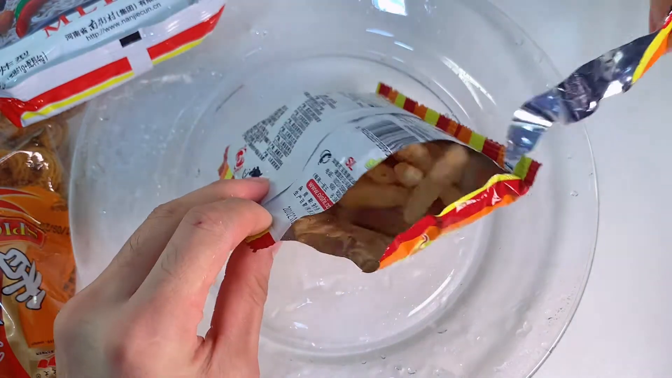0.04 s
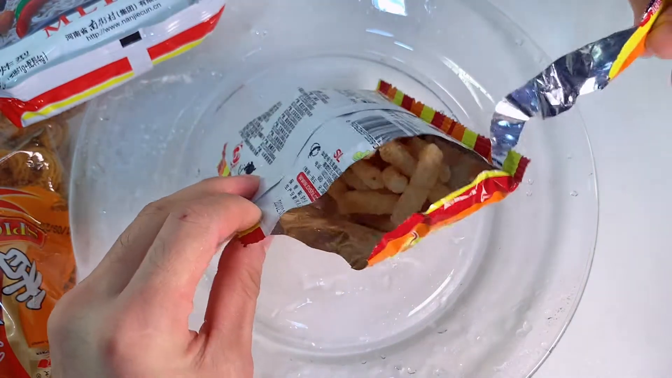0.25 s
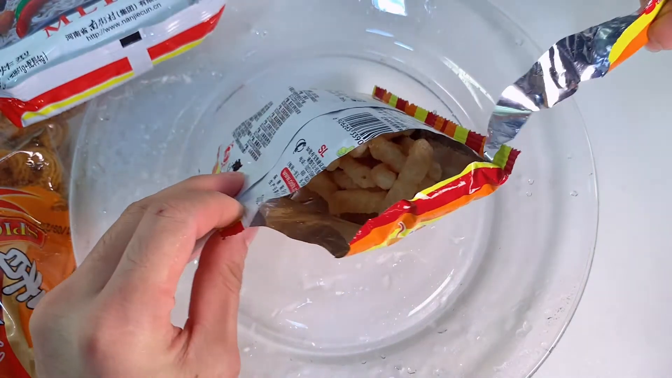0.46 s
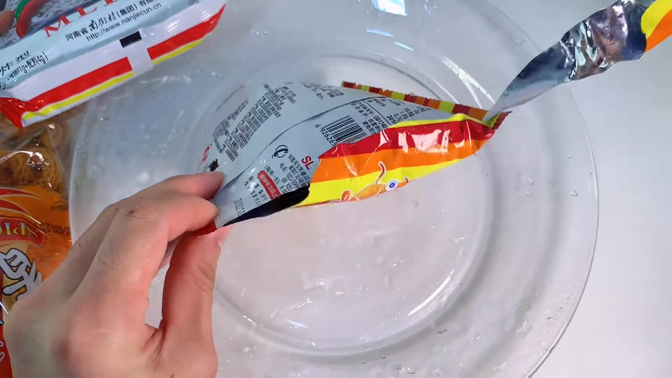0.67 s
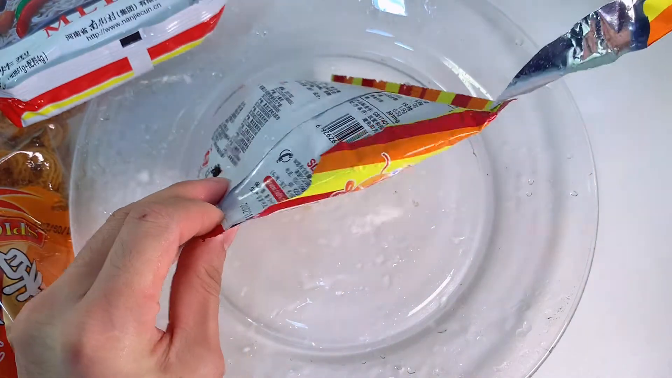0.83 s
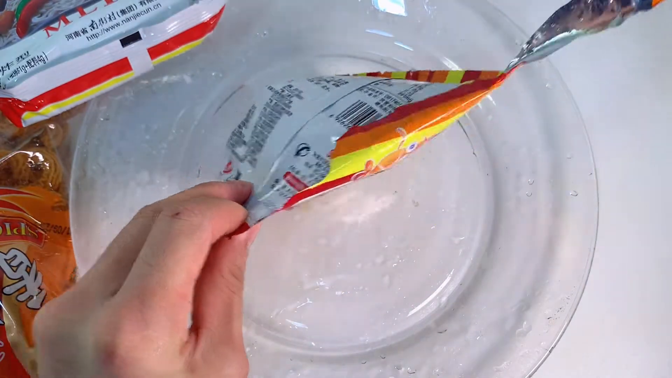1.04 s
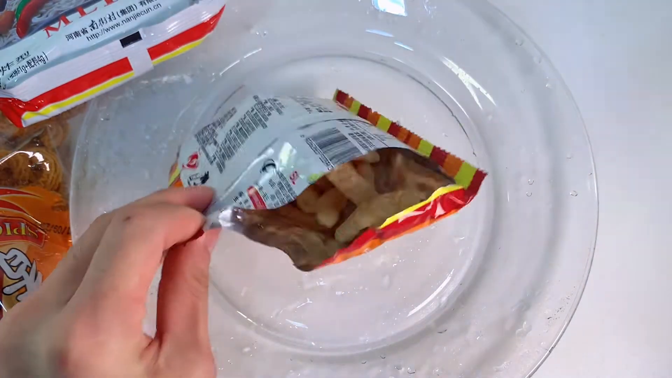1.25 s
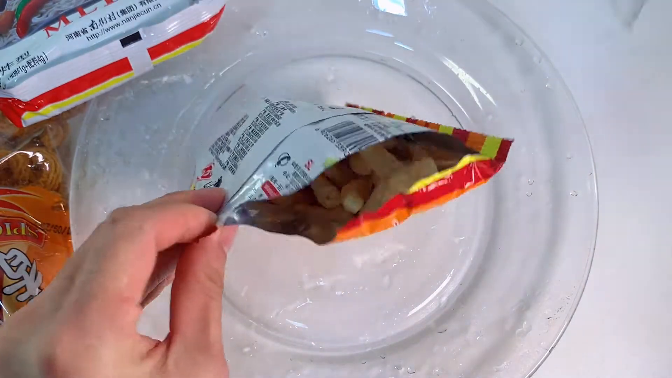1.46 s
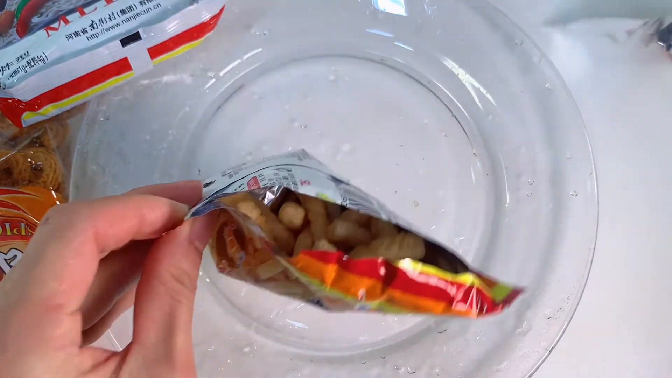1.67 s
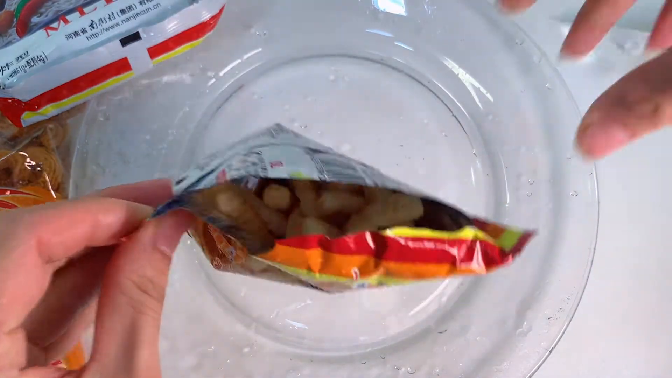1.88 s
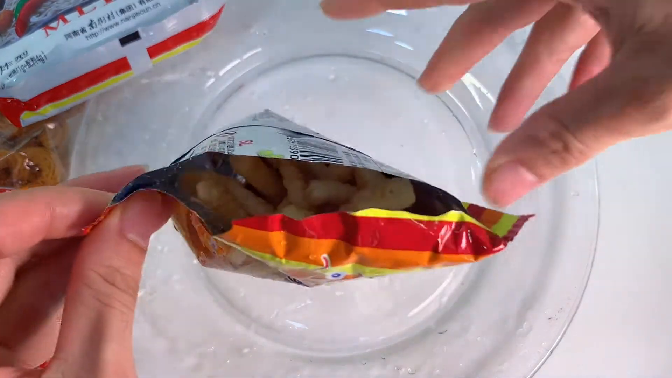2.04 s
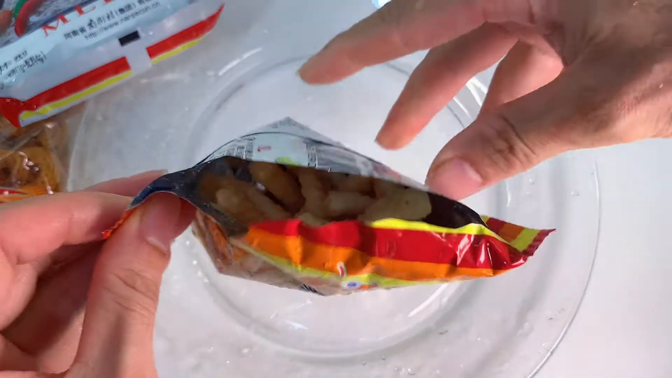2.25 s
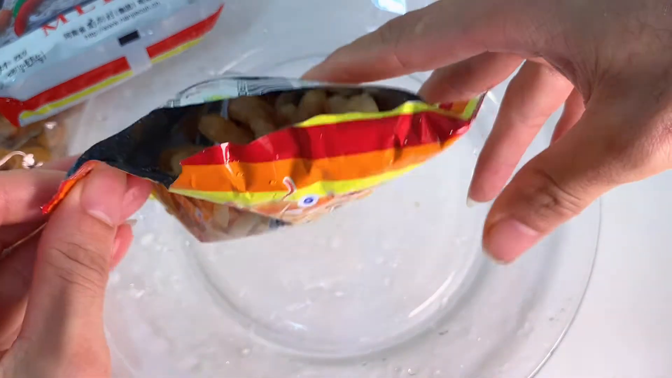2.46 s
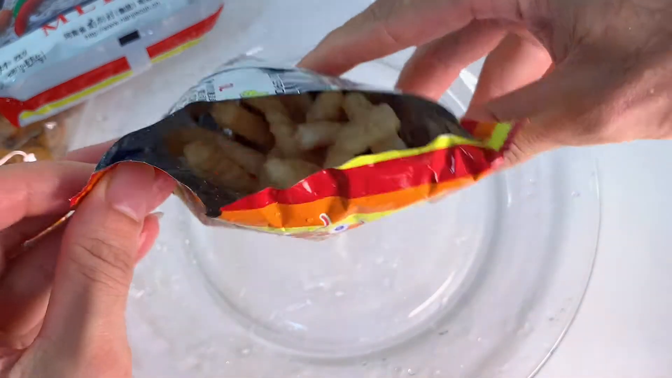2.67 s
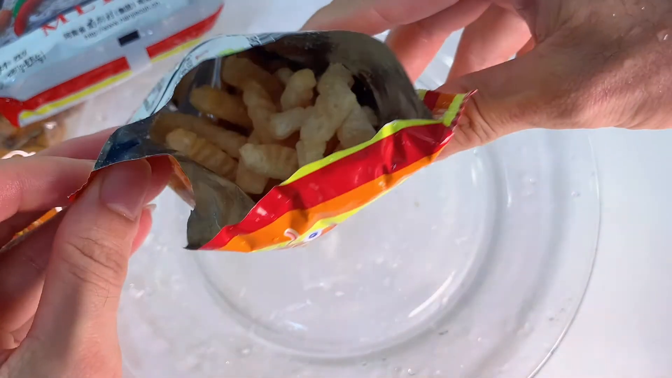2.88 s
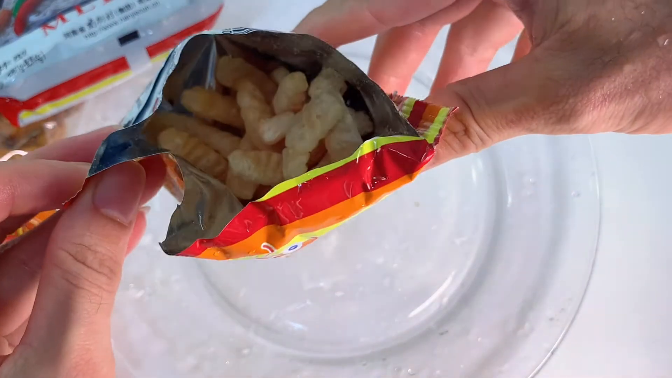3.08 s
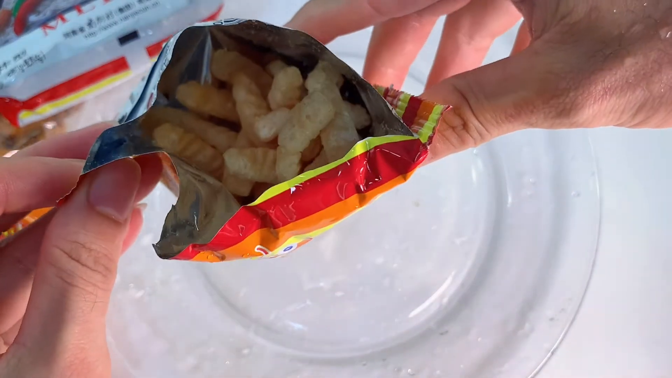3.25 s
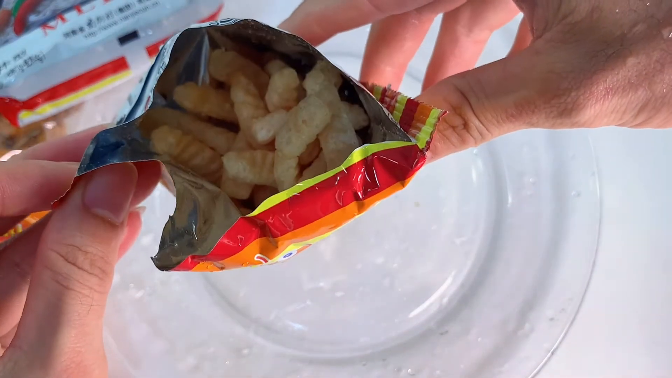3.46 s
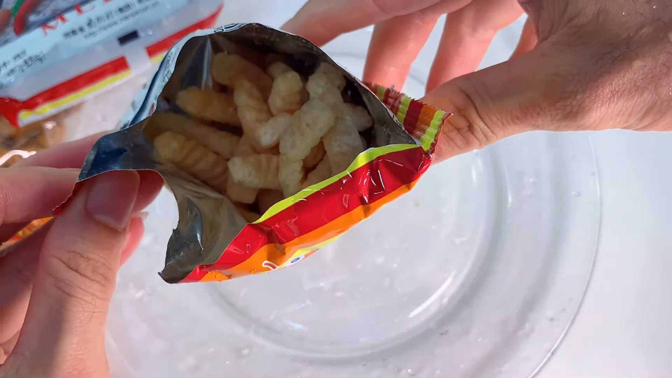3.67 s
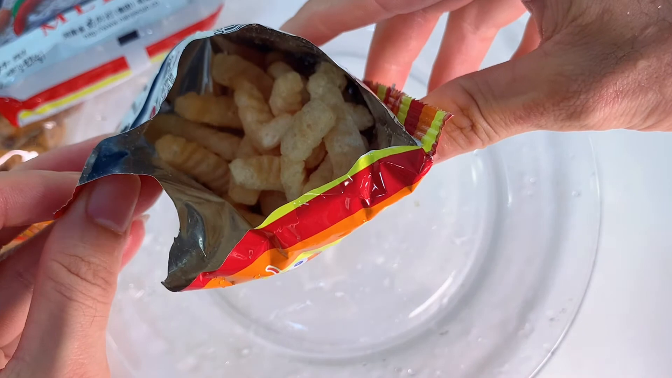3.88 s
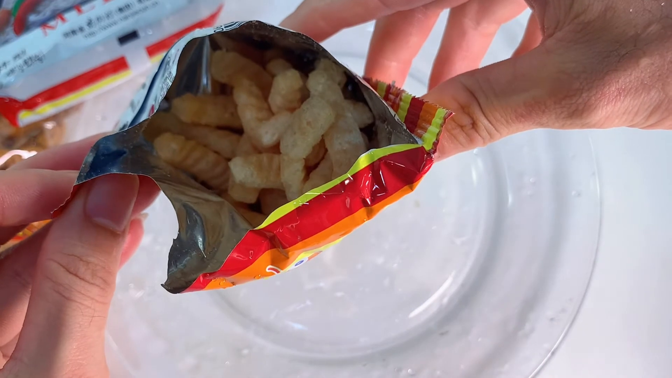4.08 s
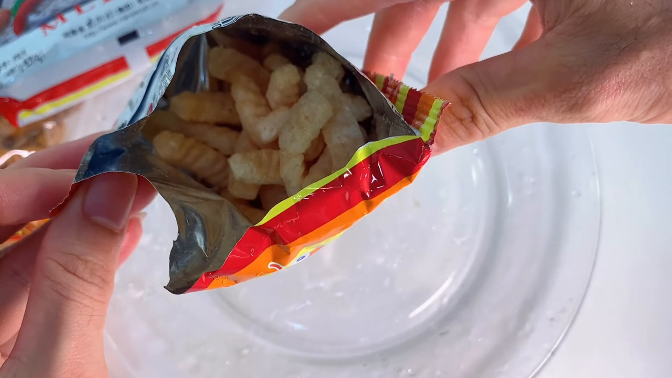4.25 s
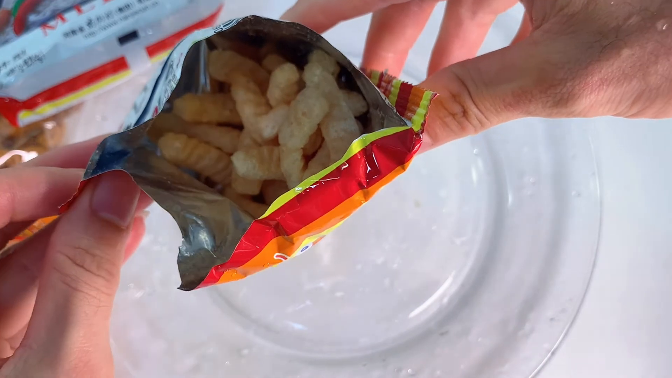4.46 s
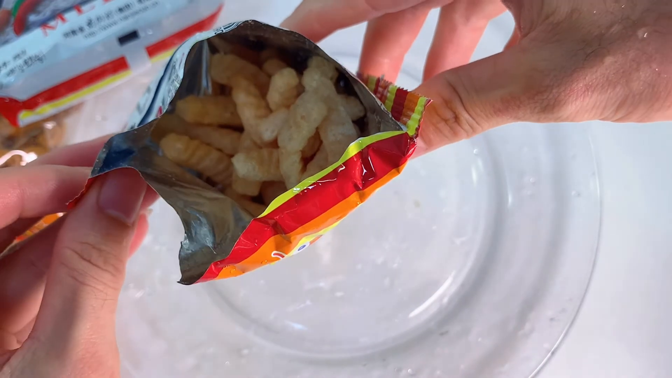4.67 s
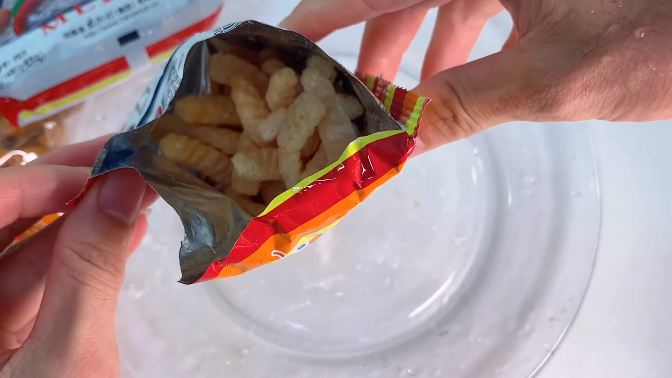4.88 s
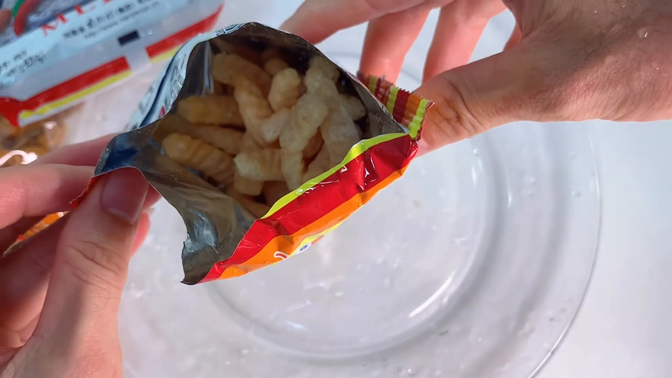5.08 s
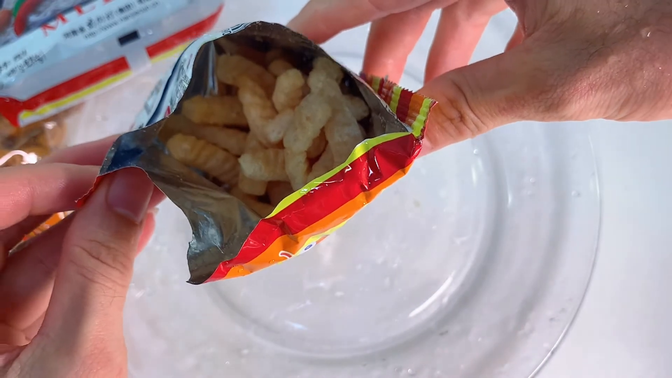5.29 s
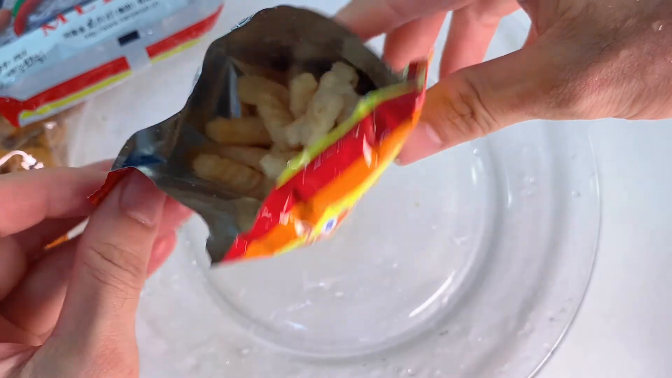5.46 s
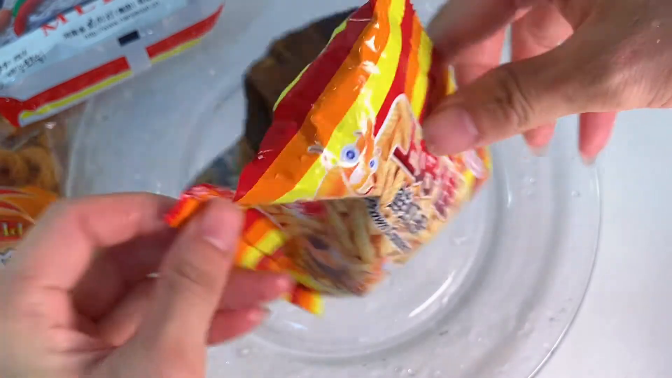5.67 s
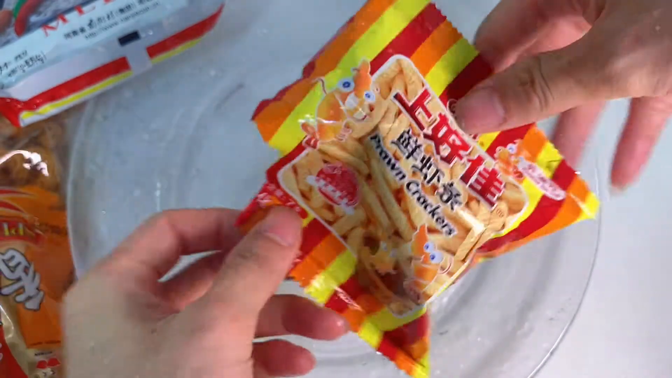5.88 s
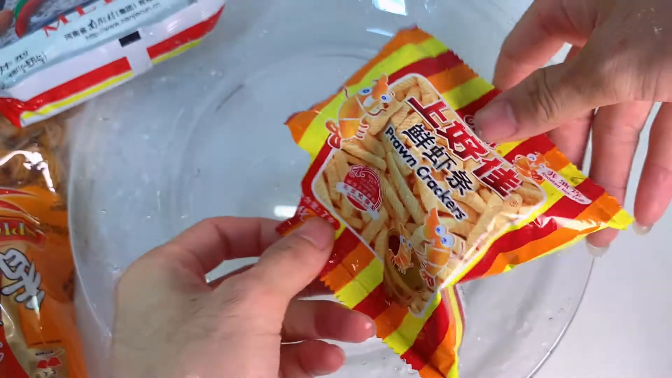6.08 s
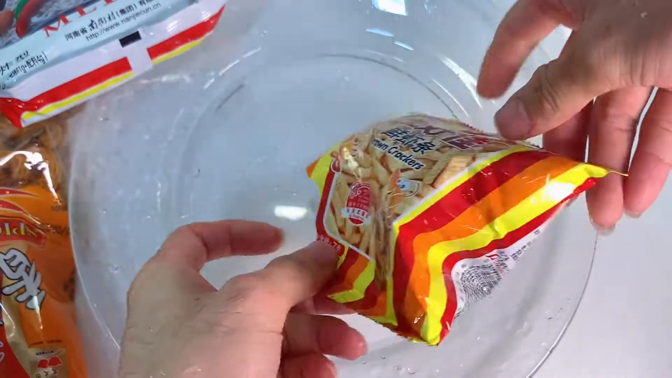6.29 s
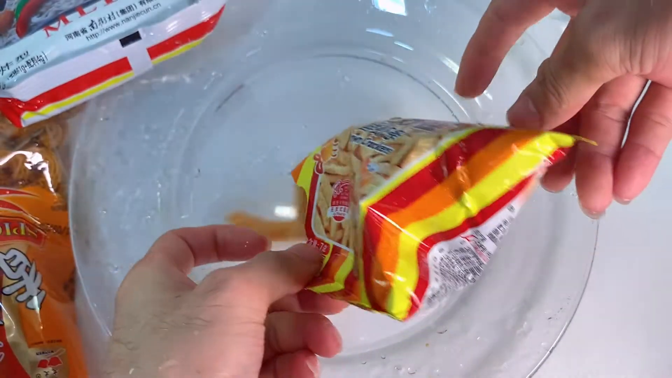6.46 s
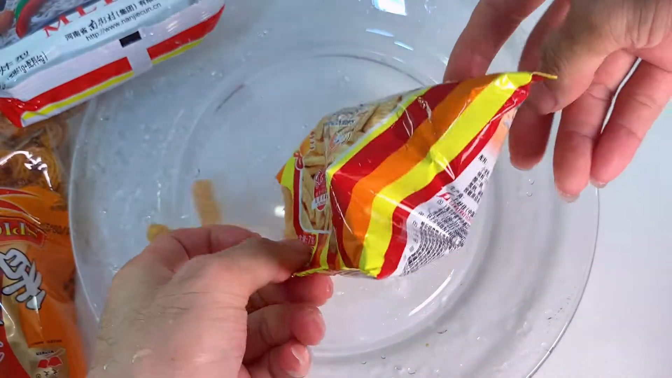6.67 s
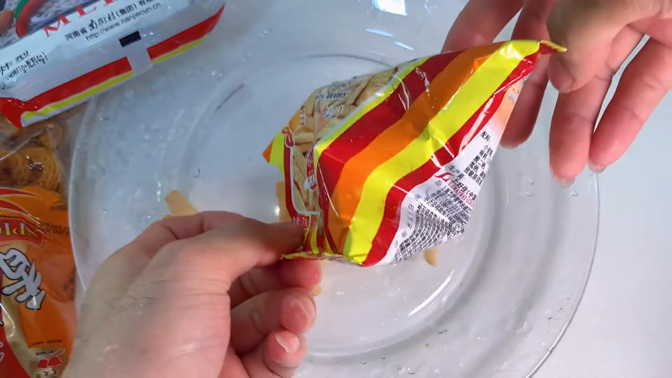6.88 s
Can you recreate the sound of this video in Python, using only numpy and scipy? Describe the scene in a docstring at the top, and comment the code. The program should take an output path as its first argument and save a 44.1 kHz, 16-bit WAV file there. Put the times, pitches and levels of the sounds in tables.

```python
"""Hands tear a strip off a foil snack packet, hold it open, then tip it over a glass bowl.
From the first touch, creases buckle in sharp snaps (struck noise bands) over a fine rustle (random grains).
Near the end a heap of crisps patters out (fading noise ticks) and rings the bowl (decaying sine modes).
Throughout, a quiet room hums behind (coloured noise) with a few faint tones, and its walls answer softly."""
import sys
import numpy as np
from scipy import signal
from scipy.fft import rfft, irfft, next_fast_len
from scipy.io import wavfile
from scipy.ndimage import uniform_filter1d

SR = 44100
rng = np.random.default_rng(int(sys.argv[2]) if len(sys.argv) > 2 else 0)


def int16_out(signal):
    """Quantize to a 16-bit WAV file."""
    q = np.round(np.clip(np.atleast_2d(signal).T, -1, 1) * 32767)
    wavfile.write(sys.argv[1], SR, q.astype(np.int16))


N = 305613  # length in samples

# Creases that buckle and crisps that knock:
# t/s, level/dB, panel ring f/Hz, treble over the level/dB
SNAP_EVENTS = [(0.072, -41.5, 1990, -11), (0.567, -39.5, 2060, -23), (0.6474, -32.5, 3270, -14),
               (0.6871, -29, 4500, 3), (0.7054, -20, 4150, -5.5), (0.766, -35, 3520, -12),
               (0.7887, -22.5, 2150, -9), (0.796, -21.5, 2770, -7), (0.808, -16.5, 2800, -7.5),
               (0.8163, -23, 4200, -19), (0.824, -28.5, 4500, -3.5), (0.8371, -20.5, 4230, -9),
               (0.8493, -25.5, 4460, -8), (0.8585, -26.5, 4700, -11), (0.8946, -36.5, 1100, -16),
               (0.952, -33, 4360, -4), (0.956, -27.5, 5600, 7), (0.9622, -30, 4500, -5),
               (0.9669, -25, 2200, -3.5), (0.9855, -35, 2280, -13), (1.0208, -31.5, 2380, -11.5),
               (1.073, -39, 3660, -9), (1.088, -22.5, 3800, 0), (1.1236, -14.5, 1990, -13.5),
               (1.127, -17, 2450, -3.5), (1.1337, -20.5, 3000, -8), (1.1393, -19.5, 3620, -7),
               (1.1625, -20, 2680, -21), (1.191, -32.5, 2900, -12), (1.2146, -29, 2030, -7),
               (1.2264, -33.5, 2500, -3.5), (1.233, -31, 2120, -15.5), (1.3289, -34, 2780, -8.5),
               (1.418, -46, 4420, -4), (1.447, -37, 2950, -1), (1.4503, -25.5, 4660, 1.5),
               (1.4597, -30.5, 4500, -5), (1.511, -26.5, 2590, -10), (1.552, -18.5, 2050, -4),
               (1.5639, -30, 5340, -4), (1.6026, -34, 3120, -3), (1.6122, -33.5, 2900, -5),
               (1.6216, -24.5, 5160, -2.5), (1.647, -26.5, 2280, -3.5), (1.6679, -30.5, 2170, -8),
               (1.697, -29, 3240, 0), (1.8342, -47.5, 1870, -31), (1.888, -50.5, 4930, 1),
               (2.029, -46.5, 1800, 2.5), (2.053, -50, 1300, -3), (2.112, -38.5, 1130, -36),
               (2.124, -31.5, 3680, -15), (2.227, -43, 1500, -17.5), (2.259, -55, 1750, 2.5),
               (2.408, -53.5, 1890, -36), (2.4404, -48, 1230, -18), (2.4895, -42, 1760, -31),
               (2.4997, -46.5, 1210, -8.5), (2.573, -46, 3500, -12), (2.581, -48.5, 1100, -27),
               (2.587, -42.5, 4200, -22), (2.6304, -27, 1120, -14), (2.665, -43, 800, -32),
               (2.688, -33.5, 1900, -32), (2.694, -35, 1300, -15), (2.712, -30, 3750, -6.5),
               (2.791, -40.5, 1690, -32), (2.809, -37.5, 870, -24), (2.8222, -35, 1310, -13),
               (2.8347, -29.5, 1920, -5.5), (2.882, -39.5, 4020, -21), (2.9262, -31, 1000, -10.5),
               (2.967, -49, 1010, -22), (3.076, -55.5, 1300, -30), (3.148, -51, 500, -30),
               (3.5897, -44, 1680, -14), (3.6105, -42.5, 1610, -37), (3.7006, -25, 2700, -19),
               (3.769, -49.5, 790, -33), (3.893, -54.5, 2900, -5), (4.2484, -49.5, 720, -25.5),
               (4.318, -31, 2600, -3), (4.7066, -48.5, 838, -31), (5.3334, -48.5, 714, -21.5),
               (5.393, -62, 5300, 6), (5.493, -48.5, 650, -33), (5.5058, -48, 4330, -34),
               (5.537, -43.5, 890, -30), (5.58, -32.5, 1660, -18), (5.599, -27.5, 1720, -13),
               (5.6068, -41, 4310, -12), (5.624, -40, 660, -19), (5.644, -34.5, 1270, -12),
               (5.7176, -23.5, 4400, -9.5), (5.721, -24.5, 1390, -1), (5.8282, -34, 5130, -28),
               (5.846, -32.5, 4950, -2.5), (5.881, -33.5, 1830, -30), (5.9043, -29.5, 3460, -22),
               (6.0066, -37, 1040, -4), (6.081, -38, 2480, -22.5), (6.1643, -30, 2170, -16.5),
               (6.205, -39.5, 1310, -9), (6.217, -43, 1930, -17), (6.292, -36.5, 2000, -12),
               (6.3566, -25, 4370, 0.5), (6.3655, -21, 3760, -3.5), (6.377, -23, 2550, -11),
               (6.447, -34, 1010, -9), (6.484, -34, 3640, -13), (6.511, -36, 2030, -11),
               (6.562, -39, 2580, -8), (6.597, -41.5, 3000, -8), (6.7396, -41, 4480, -2),
               (6.807, -35, 1910, -15), (6.828, -38, 2540, -8), (6.8985, -31.5, 3600, -2),
               (6.9038, -26.5, 1740, -11.5)]


def snaps():
    """Buckling: a crease lets go, its panel rings, its edge spits treble; dull snaps push more of the bag's air."""
    out = np.zeros(N)
    noise = rng.standard_normal((len(SNAP_EVENTS), 4, 1600))
    durations = amp(0.7 * rng.standard_normal(len(SNAP_EVENTS)))  # slightly uneven decay times
    for (s, db, hz, treble_db), (a, b, c, d), long in zip(SNAP_EVENTS, noise, durations):
        ring = amp(-5.5) * struck(a, 0.8 * hz, 1.215 * hz, 0.037 * long)
        top_hz = 5500 * amp(0.28 * min(treble_db, 0))  # dull snaps reach less high
        body = amp(-5.5) * struck(b, min(1600, top_hz / 2.6), top_hz, 0.027 * long)
        spit = amp(treble_db) * struck(c, 4800, 11500, 0.029 * long)
        thump = amp(-24.0 - 0.48 * treble_db) * struck(d, 63, 1100, 0.13)
        add(out, s, amp(db) * (ring + body + spit + thump))
    return out


def struck(noise, lo_hz, hi_hz, t60):
    """Impulsive excitation: a shiver swells into a sharp crack and outlasts it, in one band."""
    crack = 1.6 * np.roll(dying(noise, 0.07 * t60, .00005), 30)  # 30 samples late
    shiver = dying(noise, 0.36 * t60, .0007)
    tail = 0.15 * dying(noise, t60)
    x = band(crack + shiver + tail, lo_hz, hi_hz)
    x = band(x, 0.44 * lo_hz, 1.7 * hi_hz)
    return x / np.std(x[:220])  # level 1 over the first 5 ms


# Spectral weighting of the rustle: f/Hz, gain/dB (relative)
RUSTLE_SPECTRUM = [(88, -35.5), (150, -6.5), (310, -2), (500, -10), (1300, -8), (1800, -6), (11700, -9),
                   (14200, -29.5)]


def rustle():
    """Crackling noise: many small creases of very unequal size sound over the hiss of sliding foil."""
    creases_per_s = 2600
    size = amp(4.1 * np.minimum(rng.exponential(1, N), 4))
    size = size * (rng.random(N) < creases_per_s / SR)
    kind = rng.integers(0, 12, N)
    shapes = rng.standard_normal((12, 700))
    crackle = np.zeros(N)
    for k, hz in enumerate(np.geomspace(600, 9000, len(shapes))):
        grain = band(dying(shapes[k], .009), hz / 1.6, hz * 1.6)
        grain = evened(grain) * np.sqrt(hz)
        crackle += signal.oaconvolve(size * (kind == k), grain)[:N]
    hiss = .22 * rng.standard_normal(N)
    foil = colour(evened(crackle) + hiss, RUSTLE_SPECTRUM)
    return handling() * evened(foil)


RESTING_DB = -79  # foil held still
# Squeezes and pulls that rub foil and crisps:
# peak t/s, level/dB, time to swell 20 dB t/ms, time to settle 20 dB t/ms
PULL_STROKES = [(0.071, -47, 600, 259), (0.21, -56, 200, 105), (0.581, -49, 66, 400),
                (0.701, -47, 104, 200), (0.811, -34, 52, 118), (0.97, -35, 36, 91), (1.142, -30.5, 63, 185),
                (1.461, -52, 45, 400), (1.64, -39, 302.5, 114), (2.041, -55, 22, 43.5),
                (2.127, -39, 14, 41), (2.27, -56.5, 100, 62.5), (2.631, -51, 187, 498.5),
                (2.831, -52, 149, 148.5), (3.579, -52.5, 36.5, 86.5), (3.721, -65, 52.5, 600),
                (3.901, -62.5, 101, 43), (4.341, -59.5, 97, 140), (5.601, -47.5, 159.5, 190.5),
                (5.716, -39, 68, 97), (5.901, -40.5, 300, 280), (6.204, -36.5, 17, 250),
                (6.294, -39, 10, 300), (6.38, -35.5, 122, 297), (6.801, -46.5, 450, 900)]


def handling():
    """Frictional drive: every pull swells and settles exponentially at its own pace; powers add."""
    t = np.arange(0, N, 64) / SR  # one control point every 64 samples
    s, db, swell_ms, settle_ms = np.transpose(PULL_STROKES)[:, :, None]
    late_ms = 1000 * (t - s)
    before = -late_ms / np.maximum(swell_ms, 5)
    after = late_ms / np.maximum(settle_ms, 5)
    level_db = db - 20 * np.maximum(before, after)
    power = (amp(level_db) ** 2).sum(0) + amp(RESTING_DB) ** 2
    return np.interp(np.arange(N) / SR, t, np.sqrt(power))


POUR_S, POUR_DB = 6.356, -30  # start (s), level before the fade (dB)
POUR_HOLD_S, POUR_FADE_DB_PER_S = 0.13, 84  # slow part (s), its fade (dB/s)


def pour():
    """Random impact train: crisps slide out in a dense, bright patter that fades, slowly at first, then steeply."""
    t = np.arange(SR // 3) / SR
    ticks = amp(3.5 * rng.exponential(1, len(t))) * rng.standard_normal(len(t))
    ticks = ticks * (rng.random(len(t)) < 3000 / SR)  # 3000 ticks a second on average
    past_hold = np.maximum(t - POUR_HOLD_S, 0)
    level_db = POUR_DB - POUR_FADE_DB_PER_S * (t + 4 * past_hold)  # five times as steep after the hold
    patter = signal.oaconvolve(ticks, dying(rng.standard_normal(300), .008))[:len(t)]
    out = np.zeros(N)
    add(out, POUR_S, amp(level_db) * evened(band(patter, 1100, 8500)))
    return out


AWAY_DB_PER_OCTAVE = 26  # upper modes fall off away from the one nearest the spot
# Crisps landing on glass: t/s, blow level/dB, second mode over the first/dB,
# upper modes over the first/dB, upper mode nearest to the spot f/Hz
GLASS_LANDINGS = [(6.347, -37, 7, 2, 8200), (6.354, -23.5, -1, 1.5, 8200), (6.379, -26.5, 4.5, -1, 4970),
                  (6.401, -27.5, 1.5, -0.5, 4900), (6.455, -29.5, 2, -1, 4930), (6.471, -28, 3, -7, 4860),
                  (6.512, -32.5, 6.5, -9, 3970), (6.565, -45, 15.5, 1, 8100), (6.597, -39, 2.5, -9, 3950),
                  (6.779, -50, -1, 4, 4900), (6.791, -40, -5, -4, 4400), (6.805, -35.5, 0, -6, 4000),
                  (6.828, -32, -4.5, -7.5, 5530), (6.897, -44.5, 7, 17.5, 6600)]
# Modes of the glass bowl: f/Hz, decay time t60/s
BOWL_MODES = [(1480, 0.16), (1512, 0.18), (2382, 0.13), (2425, 0.17), (4045, 0.13), (4945, 0.072),
              (6370, 0.076), (8195, 0.088)]


def bowl(foil):
    """Modal synthesis: each crisp strikes another spot, so the modes share and rattle unevenly; crumbs stir them."""
    out, t = np.zeros(N), np.arange(SR // 3) / SR
    hz, t60 = np.transpose(BOWL_MODES)[:, :, None]
    decay_db = -60 * t / t60
    phases = 2 * np.pi * rng.random((len(GLASS_LANDINGS), len(BOWL_MODES), 1))
    # crisps lying on the glass load it
    detune = 1 + .006 * rng.standard_normal(phases.shape) * hz[0] / hz
    rattle = uniform_filter1d(rng.standard_normal((len(BOWL_MODES), N)), 180)
    for (s, db, second_db, upper_db, spot_hz), phase, tune in zip(GLASS_LANDINGS, phases, detune):
        share_db = upper_db - AWAY_DB_PER_OCTAVE * abs(np.log2(hz / spot_hz))
        share_db[:4, 0] = -4.5, -2, second_db, second_db - 7.0  # the two lowest modes are split pairs
        passage = evened(rattle[:, (round(s * SR) + np.arange(len(t))) % N])
        broken_db = 1.1 * np.log2(2 * hz / hz[0]) * passage  # higher modes waver more
        level = amp(db + share_db + broken_db + decay_db)
        ringing = (level * np.sin(2 * np.pi * hz * tune * t + phase)).sum(0)
        add(out, s, dying(ringing, SR))  # such a long t60 leaves only the quick rise
    # from the first landing on, the foil's rustle drives the modes as tumbling crumbs
    crumbs = foil * (np.arange(N) / SR > GLASS_LANDINGS[0][0])
    modes = (amp(decay_db) * np.sin(2 * np.pi * hz * t) * np.sqrt(hz[0] / hz)).sum(0)
    return out + amp(-40) * signal.oaconvolve(crumbs, modes)[:N]


def walls(x):
    """Diffuse reverberation: dense reflections follow the trip to the nearest wall; treble dies first."""
    taps = rng.standard_normal(SR // 3) * (np.arange(SR // 3) / SR > .012)
    middle = dying(band(taps, 700, 3800), 0.16)
    treble = dying(band(taps, 3500, 17000), 0.12)
    tail = middle + treble
    return signal.oaconvolve(x, tail / np.linalg.norm(tail))[:N]


ROOM_DB = -54.5  # rms level of the noise
# Spectrum of the room noise: f/Hz, level per Hz/dB (relative)
ROOM_SPECTRUM = [(12, -29), (20, -5.5), (57, 0), (81, -17.5), (107, -7.5), (237, -17), (310, -23.5),
                 (400, -23.5), (989, -33), (8910, -47), (14200, -49.5)]
# Faint wavering tones, one far off and four squeaks of fingers on foil:
# start t/s, end t/s, start f/Hz, end f/Hz, level/dB
FAINT_TONES = [(3.2, 3.37, 630, 660, -66), (5.5, 5.535, 4130, 4200, -59), (5.525, 5.58, 4400, 4520, -54),
               (5.51, 5.575, 4900, 4980, -60), (5.595, 5.69, 4900, 4600, -53)]


def room_noise():
    """Stationary coloured noise: steady hum, rumble and hiss, with a few faint gliding tones passing."""
    out = amp(ROOM_DB) * evened(colour(rng.standard_normal(N), ROOM_SPECTRUM))
    for start, end, from_hz, to_hz, db in FAINT_TONES:
        hz = np.linspace(from_hz, to_hz, round((end - start) * SR))
        wobble, flutter = uniform_filter1d(rng.standard_normal((2, len(hz))), 250)
        hz = hz + 16 * np.sqrt(hz) * wobble
        level = amp(db + 3.0 * evened(flutter))
        tone = np.sin(2 * np.pi * np.cumsum(hz) / SR)
        add(out, start, level * tone * signal.windows.tukey(len(hz), .5))
    return out


def amp(db):
    """Decibel law: gain of a level in dB."""
    return 10 ** (np.asarray(db) / 20)


def evened(x):
    """Power normalisation: scales x to rms 1."""
    return x / np.sqrt(np.mean(x ** 2) + 1e-20)


def colour(x, points):
    """Spectral weighting: shapes x by gains drawn on a log-frequency axis."""
    f, db = np.transpose(points)
    size = next_fast_len(len(x), True)
    hz = np.fft.rfftfreq(size, 1 / SR)
    gain = amp(np.interp(np.log(hz + 1), np.log(f + 1), db))
    return irfft(rfft(x, size) * gain, size)[:len(x)]


def band(x, lo_hz, hi_hz):
    """Band-pass filtering: keeps what lies between two frequencies."""
    sos = signal.butter(2, [lo_hz, min(hi_hz, .45 * SR)], "band", fs=SR, output="sos")
    return signal.sosfilt(sos, x)


def add(mix, s, sound):
    """Superposition: mixes a sound in at s seconds."""
    part = mix[round(s * SR):][:len(sound)]
    part += sound[:len(part)]


def dying(noise, t60, rise=0.00024):
    """Exponential decay: a signal rises quickly and falls 60 dB in t60 seconds."""
    t = np.arange(noise.shape[-1]) / SR
    return noise * (1 - np.exp(-t / rise)) * amp(-60 * t / t60)


def scene():
    """Direct and reflected sound: packet and bowl close by, with a little of the room."""
    foil = rustle()
    near = snaps() + foil + pour() + bowl(foil)
    return (near + amp(-21.5) * walls(near) + room_noise())[None]


def record(dry):
    """Band limitation: the microphone rolls off toward the band limit."""
    dry = signal.sosfilt(signal.butter(4, 13000, fs=SR, output="sos"), dry)
    edge = signal.firwin(151, 14000, window=("kaiser", 7), fs=SR)  # steep low-pass at 14 kHz
    return signal.oaconvolve(dry, edge[None], "same")


dry = scene()
out = record(dry)
int16_out(out)
```